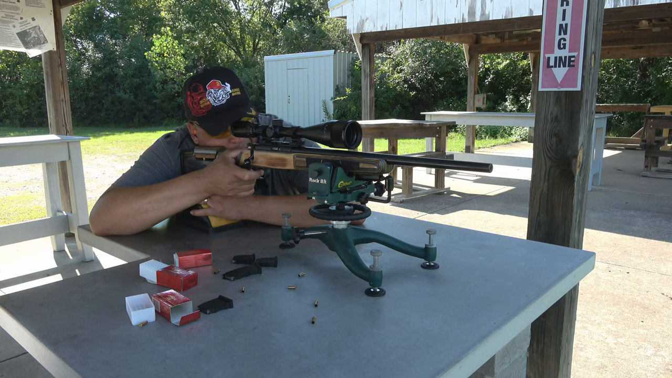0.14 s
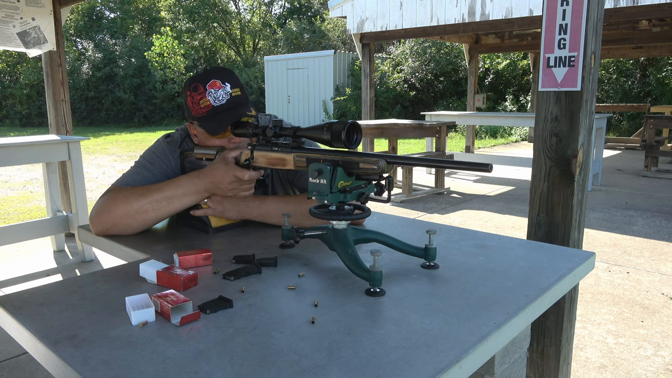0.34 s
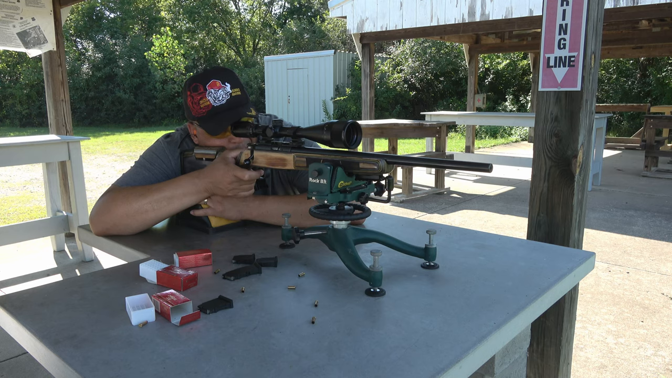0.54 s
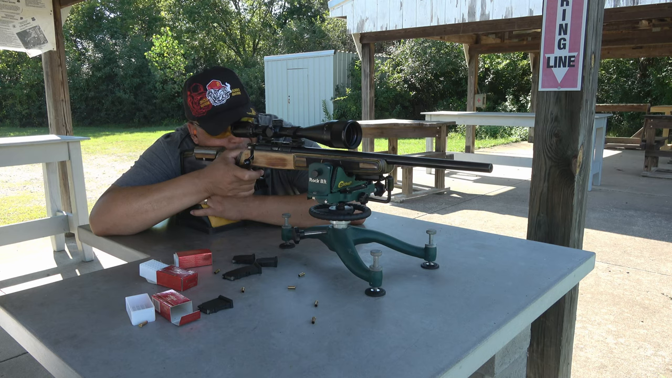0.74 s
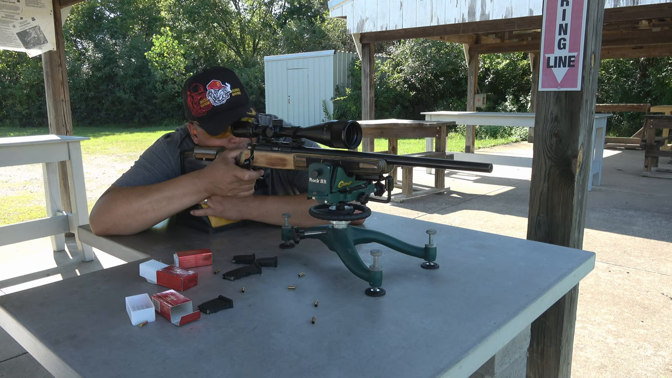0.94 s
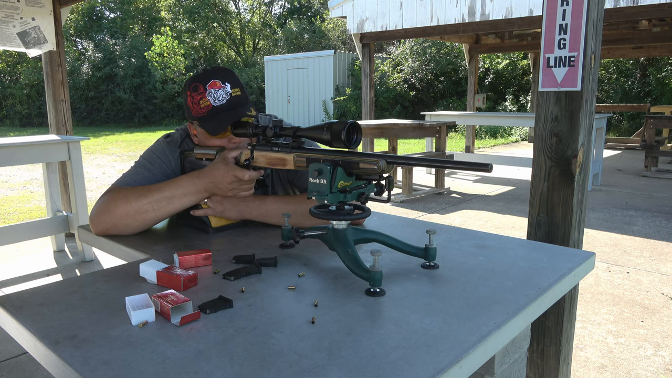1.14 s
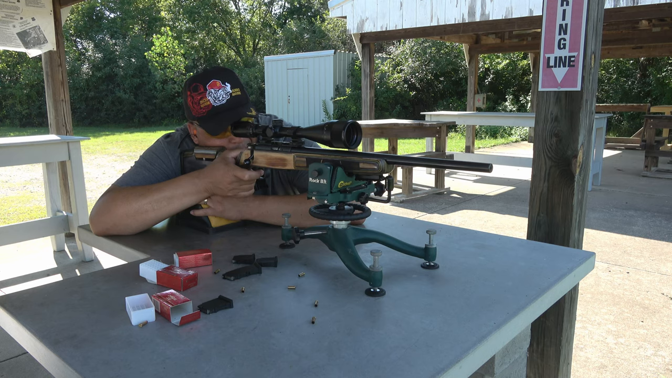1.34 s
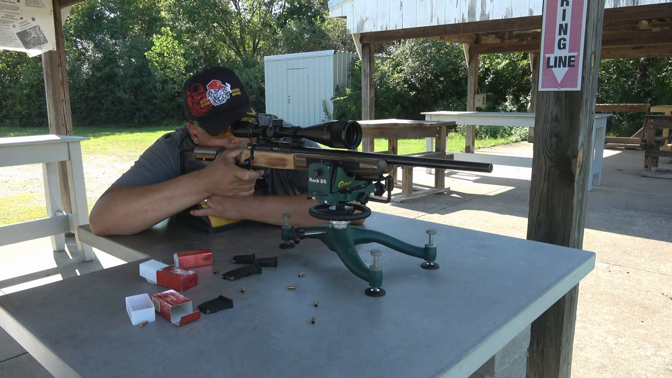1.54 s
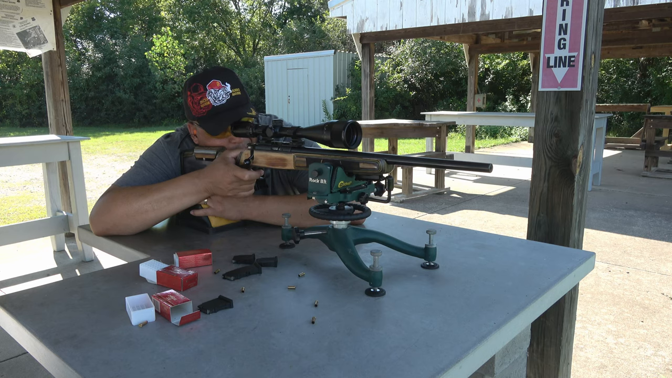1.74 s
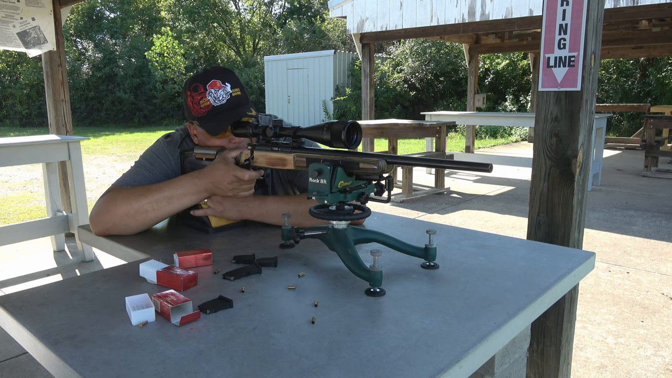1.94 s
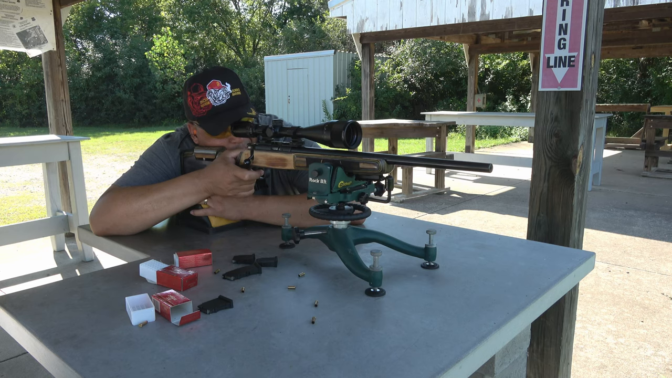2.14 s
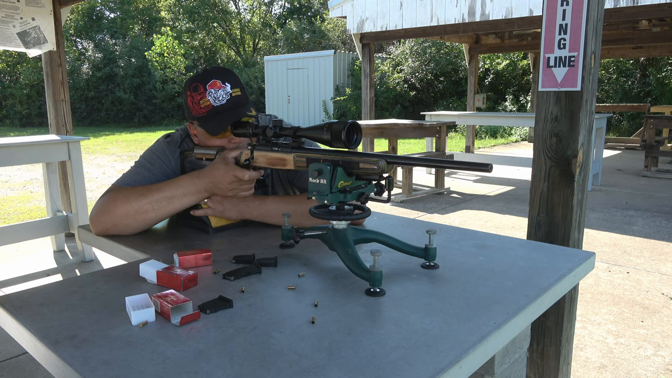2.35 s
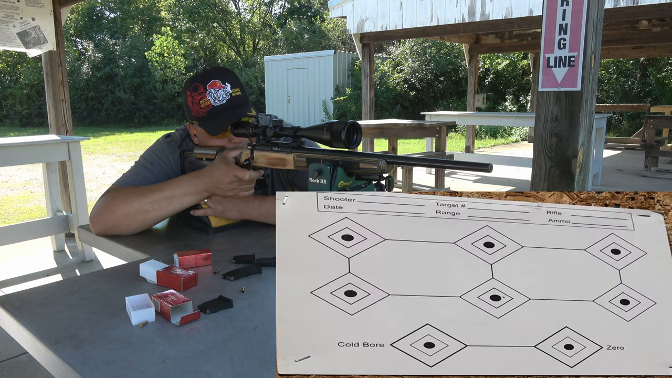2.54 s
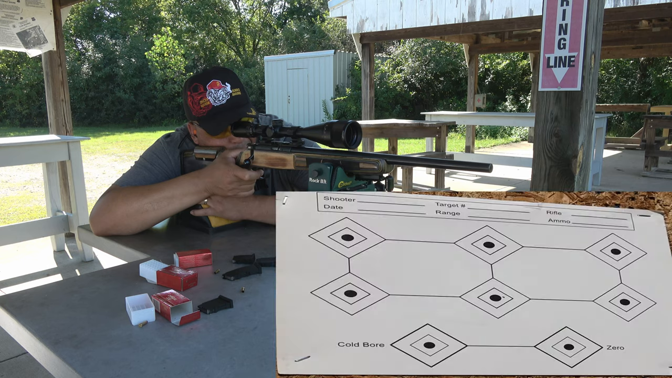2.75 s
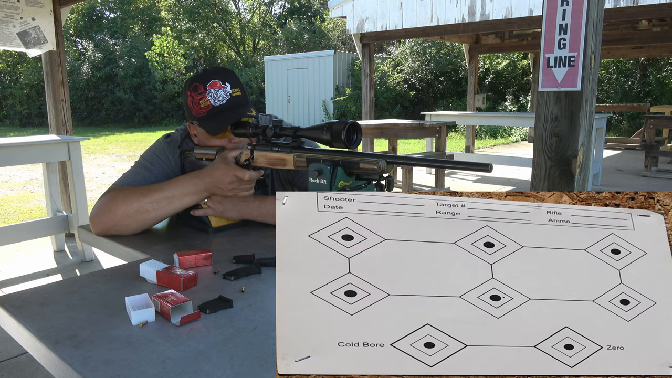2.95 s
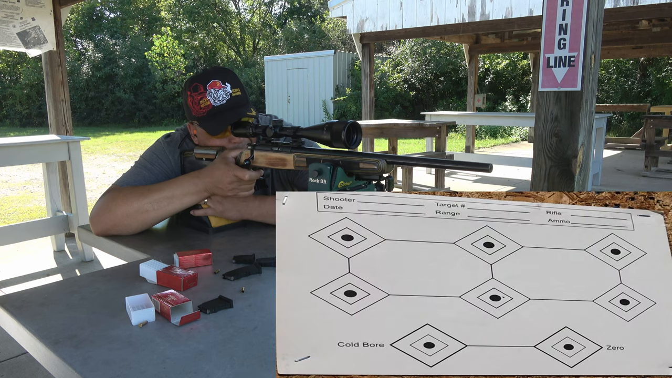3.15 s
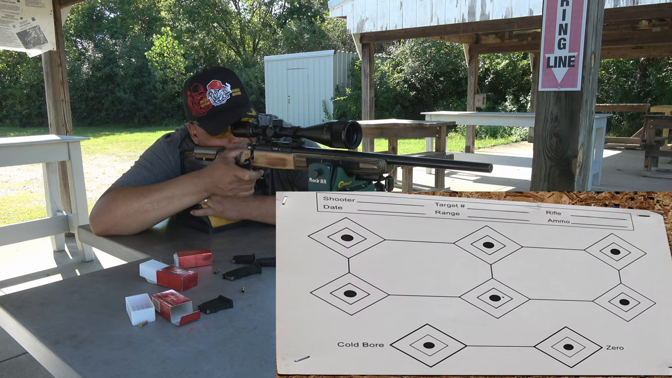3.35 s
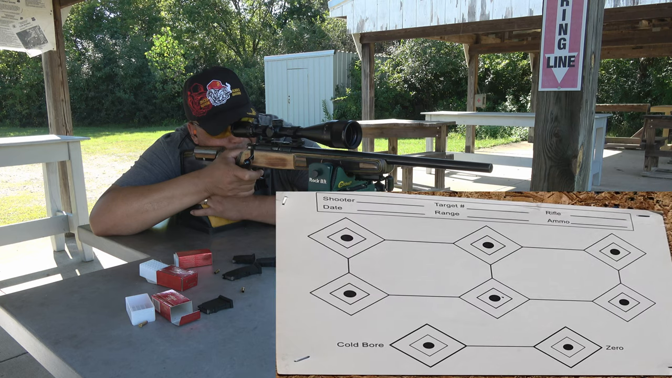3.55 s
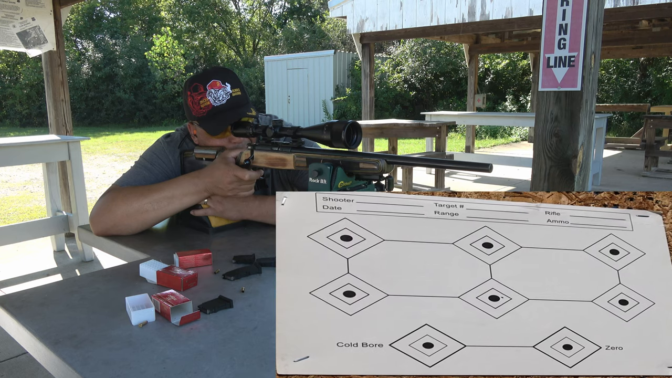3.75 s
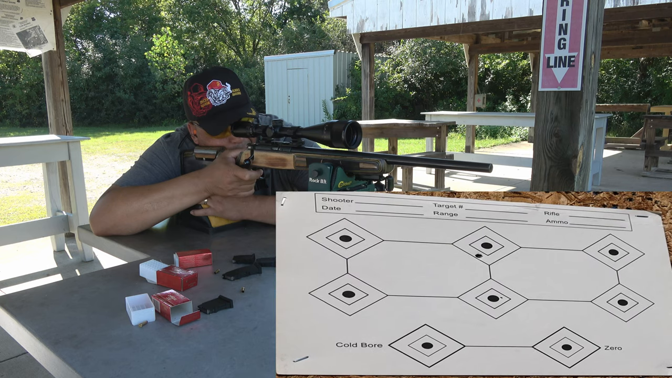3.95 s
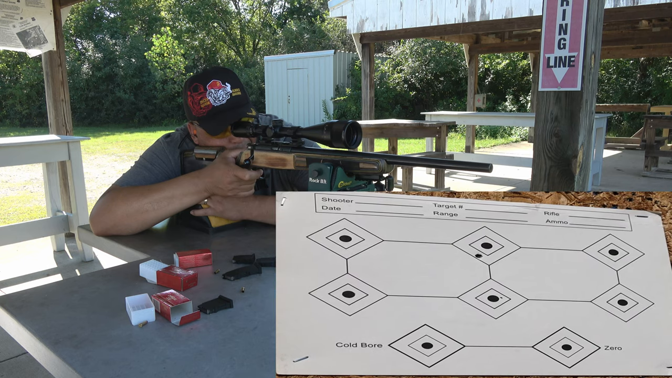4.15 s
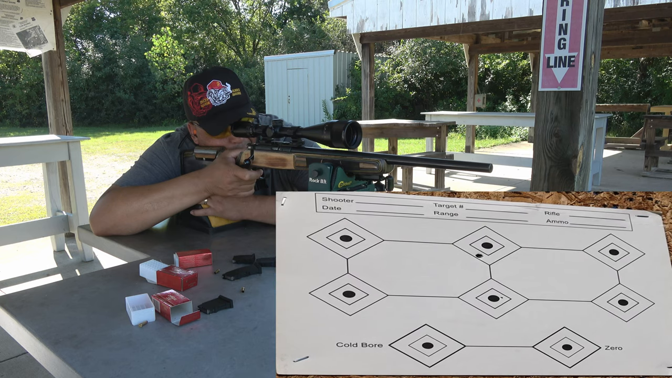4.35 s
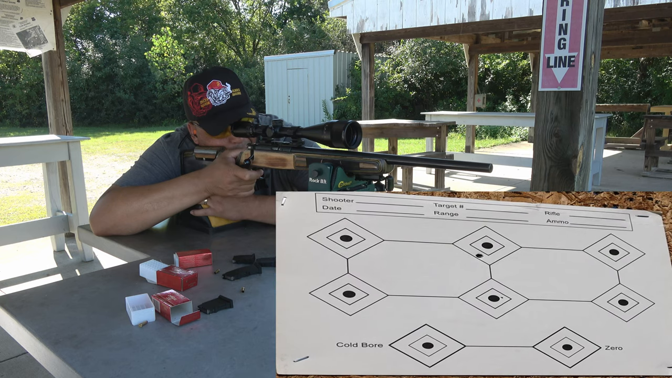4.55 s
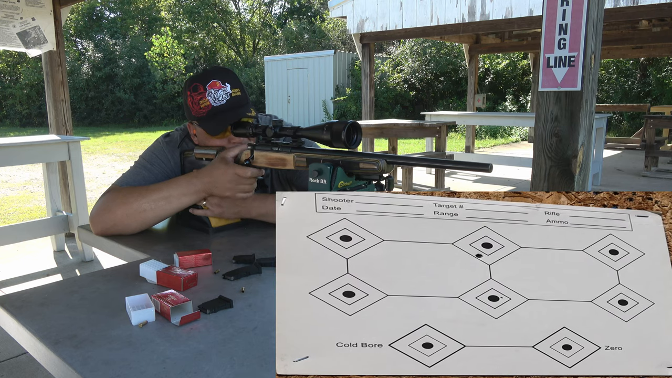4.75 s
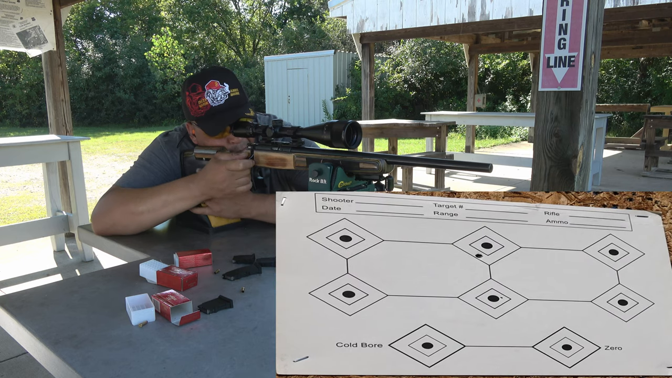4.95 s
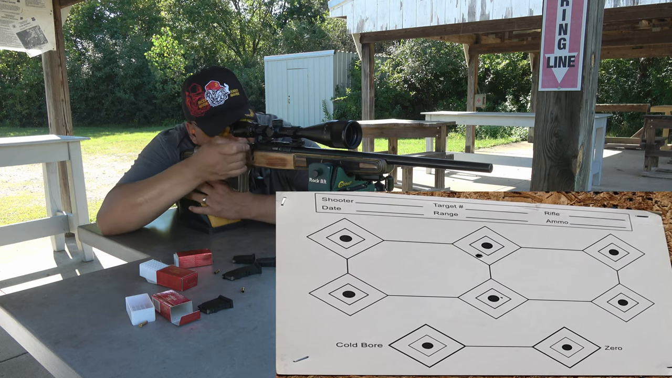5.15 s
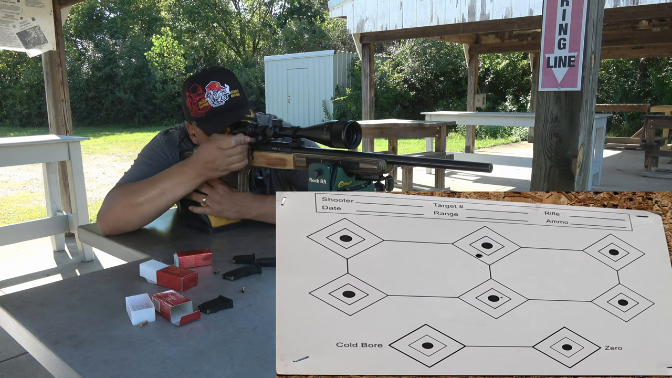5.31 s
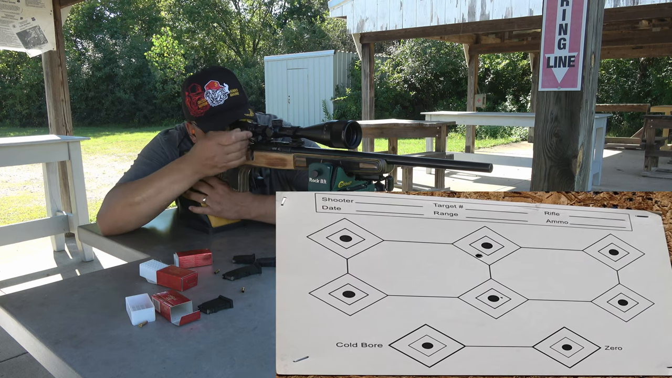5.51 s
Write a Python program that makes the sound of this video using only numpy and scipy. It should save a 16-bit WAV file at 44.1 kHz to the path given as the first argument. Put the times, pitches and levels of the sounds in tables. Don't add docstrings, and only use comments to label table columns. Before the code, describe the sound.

A single loud small-calibre gunshot cracks over constant insect song, its slap echo clattering back before hard metallic bolt clacks.

```python
import sys
import numpy as np
from scipy import signal
from scipy.fft import rfft, irfft, next_fast_len
from scipy.io import wavfile
from scipy.ndimage import uniform_filter1d

SR = 44100
rng = np.random.default_rng(int(sys.argv[2]) if len(sys.argv) > 2 else 0)


def voltage_ratio(decibels):
    exponent = np.asarray(decibels, float) / 20
    return 10 ** exponent


def to_wav(s):
    ch = np.atleast_2d(s).T
    pcm = np.round(np.clip(ch, -1, 1) * 32767)
    wavfile.write(sys.argv[1], SR, pcm.astype(np.int16))


N = 250488
T = np.arange(N) / SR
SHOT_S = 3.8872
SINCE_SHOT = np.maximum(T - SHOT_S, 0)
BASS_ONSET = np.clip(SINCE_SHOT / 0.017, .01, 1) ** 2


def noise():
    return rng.standard_normal(N)


def unit(x):
    return x / np.sqrt(np.mean(x ** 2))


def fade(t, t60):
    return np.exp(-np.log(1000) * t / t60)


def curve(rows):
    s, db = np.transpose(rows)[:2]
    return voltage_ratio(np.interp(T, s, db, left=-200, right=-200))


def swell(rows):
    total = 0
    for s, db, rise, hold, t60 in rows:
        climb = np.maximum(s - T, 0) / rise
        decay = np.maximum(T - s - hold, 0) / t60
        total = total + voltage_ratio(db - 60 * (climb + decay))
    return total


def colour(x, points):
    hz, db = np.transpose(points)[:2]
    f = np.log(np.arange(len(x) // 2 + 1) * SR / len(x) + 1)
    return irfft(rfft(x) * voltage_ratio(np.interp(f, np.log(hz), db)), len(x))


def band(x, hz, width):
    f = np.arange(len(x) // 2 + 1) * SR / len(x)
    return irfft(rfft(x) * np.exp(-((f / hz - 1) / width) ** 2), len(x))


def swelling_band(rows, hz, width):
    return swell(rows) * unit(band(noise(), hz, width))


def walk(rate):
    k = int(SR / rate)
    held = np.repeat(rng.standard_normal(N // 8)[:N // k + 1], k)
    return uniform_filter1d(uniform_filter1d(held, k), k)[:N]


def add(out, s, piece):
    i = int(s * SR)
    out[i:i + len(piece)] += piece[:N - i]


def hedge(x, hz, t60, wet_db):
    t, wet = T[:SR // 3], 0
    for _ in range(2):
        haze = band(rng.standard_normal(len(t)), hz, .3) * fade(t, t60) * np.minimum(t / .015, 1)
        path = signal.oaconvolve(x, haze / np.linalg.norm(haze))[:N]
        wet = wet + np.interp(T + .0001 * walk(150), T, path) / np.sqrt(2)
    return x + voltage_ratio(wet_db) * wet


# (f/Hz, density/dB per Hz)
AIR_SPECTRUM = [(25, -12.5), (45, -9), (75, 2), (120, 5), (170, -4.5), (250, -7.5), (600, -11.5),
                (1200, -21.5), (2500, -23), (4000, -26), (9000, -20), (12000, -25), (15000, -27),
                (16000, -36)]
# (t/s, level/dB, rise/s, hold/s, t60/s)
GUSTS = [
    (2.1, -62, 3.5, .02, 1.5),
    (2.75, -64, 0.89, .01, 1.2),
    (5.66, -78, 4.4, .05, 1.5),
]
# (t/s, level/dB about its mean)
BREEZE = [(0, -0.4), (1, -0.3), (1.8, -0.5), (2.8, 0.6), (3.8, 1.15), (4.6, 0.5), (5.68, 1.1)]


def air():
    base = colour(noise(), AIR_SPECTRUM)
    bands = [band(base, hz, 0.63) * voltage_ratio(1.9 * walk(8.8)) for hz in 30 * 2. ** np.arange(0, 9.5, .75)]
    return voltage_ratio(-61) * curve(BREEZE) * unit(sum(bands)) + swelling_band(GUSTS, 35, 0.98)


def leaves():
    return voltage_ratio(-81) * curve(BREEZE) ** 5 * unit(band(noise(), 13500, 0.18)) * voltage_ratio(1.5 * walk(20))


# (t/s, level/dB, rise/s, hold/s, t60/s)
SLEEVE = [(4.8, -63, 0.77, 0.53, 0.45)]
# (t/s, level/dB, rise/s, hold/s, t60/s)
BUSTLE = [
    (2.55, -82, 0.86, .05, 2.5),
    (4.75, -74.5, 3, 0.1, 2.5),
    (5.55, -63, 2.3, 0.0052, 0.22),
]
# (t/s, peak/dB, f/Hz, t60/s)
BUMPS = [
    (2.561, -54, 536, 0.33),
    (2.63, -51, 501, 0.19),
    (3.058, -53, 221, 0.28),
    (3.501, -52, 225, 0.34),
    (3.549, -53, 515, 0.17),
    (5.598, -55, 232.5, 0.84),
]


def shed_noises():
    out = swelling_band(SLEEVE, 349, 0.54) * voltage_ratio(2.0 * walk(5.5))
    bustle_level = voltage_ratio(-73) + swell(BUSTLE)
    out += bustle_level * unit(band(noise(), 900, 0.99)) * voltage_ratio(2.5 * walk(8.6))
    t = T[:SR // 3]
    for s, db, hz, t60 in BUMPS:
        add(out, s, voltage_ratio(db) * np.sin(2 * np.pi * hz * t) * np.minimum(t / 0.041, 1) * fade(t, t60))
    return out


# (t/s, level/dB, rise/s, t60/s)
FAR_SHOTS = [
    (.495, -56, 0.017, 0.64),
    (.54, -61.5, 0.007, .5),
    (2.895, -57, 0.016, 0.82),
    (3.06, -65.5, 0.014, 0.7),
    (4.691, -73, 0.0096, 0.25),
]
# (f/Hz, density/dB per Hz)
FAR_SPECTRUM = [(200, -23), (500, -1), (900, 2.5), (1500, -8), (2500, -16), (5000, -34.5)]


def far_shots():
    out, t = np.zeros(N), T[:SR // 2]
    for s, db, rise, t60 in FAR_SHOTS:
        thud = unit(colour(rng.standard_normal(len(t)), FAR_SPECTRUM))
        add(out, s, voltage_ratio(db) * thud * np.minimum(t / rise, 1) * fade(t, t60))
    return out


# (t/s, level/dB)
CICADA_SWELL = [(0, -45.5), (1.07, -46), (2.07, -44), (3.0, -45), (4.3, -45.5), (5.68, -45.5)]
# (f/Hz, density/dB per Hz)
CICADA_SPECTRUM = [(3410, -55.5), (5800, -59), (6210, -39.5), (6370, -21), (6850, 1.5), (7770, 8),
                   (8340, 2.5), (8640, -14), (8960, -18.5), (9550, -17), (9850, -37.5), (10800, -35.5),
                   (11500, -35.5), (15000, -60.5), (22000, -120)]


def cicadas():
    clicks = (rng.random(N) < 2500 / SR) * noise()
    blur = 0.26 * noise()
    chorus = unit(colour(clicks + blur, [(5000, -60.0)] + CICADA_SPECTRUM + [(13000, -57.0)]))
    return curve(CICADA_SWELL) * voltage_ratio(-1.9 + 1.0 * walk(34)) * chorus


# (t/s, level/dB, rise/s, hold/s, t60/s)
TRILL = [(4.85, -72, .7, 1.5, 1.5)]
# (t/s, level/dB, rise/s, hold/s, t60/s)
RASP = [(.01, -65, .3, .23, .06)]


def small_insects():
    trill = swelling_band(TRILL, 5700, .024) * (1 + 0.3 * np.sin(2 * np.pi * 55 * T))
    rasp_gate = .25 + .7 * np.clip(np.sin(2 * np.pi * 37 * T), 0, 1) ** 2
    return trill + swelling_band(RASP, 14400, .1) * rasp_gate


def whistle(strokes, length, fall_hz, lift_db):
    out, t = np.zeros(N), np.arange(int(length * SR)) / SR
    for s, db, hz in strokes:
        pitch = hz + fall_hz * (.2 - (t / length) ** 2.2)
        shape = np.minimum(t / 0.0058, 1) * (1 - (t / length) ** 5.9)
        phase = 2 * np.pi * np.cumsum(pitch) / SR
        third = (hz < 4750) * voltage_ratio(-26) * fade(t, .07) * np.sin(3 * phase)
        add(out, max(s - .003, 0), voltage_ratio(db + lift_db) * shape * (np.sin(phase) + third))
    return out


# (t/s, peak/dB, f/Hz)
TICKS = [(5.026, -68.5, 14000), (5.156, -68, 13730), (5.218, -69, 14200), (5.28, -65, 13900),
         (5.348, -67, 14000), (5.6, -64, 13950), (5.664, -63, 13900)]


def ticks():
    return hedge(whistle(TICKS, .009, 300, 0), 14000, .05, -11)


# (t/s, peak/dB, f/Hz)
BIRD = [
    (2.47, -74, 3326),
    (2.5, -74, 3050),
    (3.7, -77, 3070),
]


def bird():
    return hedge(whistle(BIRD, .03, 250, 0), 3300, .3, -8.5)


# (t/s, length/s)
KATYDID = [(.023, 0.063), (.256, 0.043), (.447, 0.051), (.7053, 0.042), (0.905, 0.038), (1.103, .065),
           (1.302, 0.047), (1.556, 0.051), (1.714, 0.061), (1.903, 0.031), (2.046, 0.067), (2.2074, 0.05),
           (2.373, 0.051), (2.5553, 0.041), (2.7232, 0.035), (2.897, 0.057), (3.085, 0.034), (3.27, 0.051),
           (3.447, 0.066), (3.637, 0.035), (3.84, 0.061), (4.527, 0.058), (4.7287, 0.042), (4.946, 0.044),
           (5.148, 0.054), (5.35, 0.048), (5.555, 0.042)]


def katydid():
    out, wobble_hz, strokes_per_s = np.zeros(N), 60 * walk(126), 126
    for s, length in KATYDID:
        db = -48.5 - 125.5 * length
        cycle = T[:int(length * SR)] * strokes_per_s
        gate = np.clip(np.sin(np.pi * np.minimum(cycle % 1 / .75, 1)) * 2, 0, 1)
        attack = np.minimum(0.26 + 0.23 * cycle, 1)
        pitch = 9800 - 550 * (cycle % 1) + wobble_hz[int(s * SR):][:len(cycle)]
        tone = np.sin(2 * np.pi * np.cumsum(pitch) / SR)
        add(out, s - .001, voltage_ratio(db - 2.0) * gate * attack * tone)
    return hedge(out, 9600, .2, -14.5)


def chirps(rows, strokes):
    out = np.array([(s + at * span, db + g, hz) for s, db, span in rows for at, g, hz in strokes])
    return out + rng.standard_normal(out.shape) * [0, 1.5, 25]


# (place in the chirp 0-1, level/dB, f/Hz); the high cricket leads in faintly
LOW_STROKES = [(0, -3.5, 4600), (.47, -1.5, 4680), (1, -1.5, 4663)]
HIGH_STROKES = [(-.28, -15, 4850), (0, -4, 5060), (.47, -3, 5110), (0.999, -2.5, 5120)]
FAR_STROKES = [(0, -0.5, 4930), (.48, 0.5, 4843), (1, -2, 4770)]
# (t/s, peak/dB, first to last stroke/s)
LOW_CRICKET = [(.0693, -43.5, 0.082), (.47, -42.5, 0.081), (.8357, -44, 0.079), (1.2445, -43, 0.078),
               (1.6486, -43, 0.081), (1.998, -44, .081), (2.375, -43, .084), (2.9205, -46.5, 0.077),
               (3.3048, -42.5, 0.073), (4.6523, -45, 0.08)]
HIGH_CRICKET = [(.0832, -54, 0.061), (.401, -51.5, 0.071), (.7088, -49.5, 0.076), (1.0166, -50, 0.07),
                (1.3039, -48, 0.063), (1.6067, -47.5, 0.075), (1.8946, -51, 0.074), (2.147, -49, 0.062),
                (2.4503, -50, 0.08), (2.8774, -54.5, 0.078), (3.1802, -51, 0.077), (3.4765, -51.5, 0.073),
                (3.7763, -48.5, 0.072), (4.4283, -50, 0.081), (4.9716, -49, 0.074)]
FAR_CRICKET = [(.0094, -51.5, 0.074), (.87, -53, 0.082), (2.4967, -54.5, 0.068), (2.8549, -51.5, 0.083),
               (3.2136, -51, 0.075), (3.6371, -52, 0.081), (4.8239, -52, .066), (5.2415, -54.5, 0.081),
               (5.5692, -55, 0.074)]


def crickets():
    low = whistle(chirps(LOW_CRICKET, LOW_STROKES), 0.025, 520, -1.8)
    high = whistle(chirps(HIGH_CRICKET, HIGH_STROKES), .02, 360, 0.64)
    far = whistle(chirps(FAR_CRICKET, FAR_STROKES), .02, 650, -7.5)
    near = hedge(low, 5620, .4, -14.5) + hedge(high, 4100, 0.53, -12.5)
    return near + hedge(far, 4850, .3, -5.5)


# (f/Hz, density/dB per Hz)
CRACK = [(3000, -18), (7500, 0), (9000, -2), (10500, -12), (13000, -19), (16000, -28)]


def knocks(events, cycles, tail_colour, tail_db, tail_t60, body, body_db, size):
    out, t = np.zeros(N), T[:size]
    tail_shape = fade(t, tail_t60) * np.cos(np.pi / 2 * t / t[-1]) * np.minimum(t / 0.0008, 1)
    for s, db, hz, treble_db in events:
        a, b, c = rng.standard_normal((3, len(t)))
        t60 = min(cycles / hz * voltage_ratio(-0.18 * db), 0.045)
        rise = np.minimum(t / min(.0005, 2 / hz), 1)
        ring = (np.sin(2 * np.pi * hz * t) + 0.59 * unit(band(a, hz, 0.15))) * fade(t, t60)
        crack = voltage_ratio(treble_db) * unit(colour(b, CRACK)) * fade(t, .5 * t60)
        modes = 0
        for k, (f, g, d) in enumerate(body):
            mode = np.sin(2 * np.pi * f * (1 + 0.0194 * a[k]) * t)
            modes = modes + voltage_ratio(g + 6.7 * c[k]) * mode * fade(t, d)
        tail = voltage_ratio(tail_db - 0.069 * db) * unit(colour(c, tail_colour)) * tail_shape
        add(out, s, voltage_ratio(db) * rise * (ring + crack + voltage_ratio(body_db) * modes + tail))
    return out


# (t/s, peak/dB, ring f/Hz, treble/dB)
HAND = [(3.494, -66, 2500, -20), (3.502, -61, 3050, -20), (3.5105, -59, 3300, -20), (3.519, -60, 3600, -20),
        (3.528, -62, 3900, -20), (3.537, -63, 3000, -20), (3.564, -64, 2600, -20), (3.665, -64, 3400, -20),
        (4.597, -47.5, 3126, -12), (4.598, -50, 1500, -20), (4.700, -41, 1195, 2),
        (4.7045, -49, 3500, -6.5), (4.739, -54, 627, -24), (4.7435, -42.5, 3120, -15),
        (4.768, -53.5, 2030, -24), (5.097, -55, 2200, -25), (5.115, -60, 2307, -24.5),
        (5.178, -54, 2490, -25), (5.183, -48, 1990, -25), (5.215, -56, 5190, -20), (5.215, -56, 11000, -6),
        (5.53, -60, 2540, -17.5)]
# (t/s, peak/dB, ring f/Hz, treble/dB)
BOLT = [(5.1222, -50, 13400, -3), (5.126, -50, 12800, -5), (5.1266, -26.5, 1880, -15),
        (5.133, -44, 1380, -13), (5.141, -41.5, 2010, -15), (5.129, -44, 4300, -7.5),
        (5.132, -58, 12900, -9), (5.1282, -36, 766, -30), (5.370, -40, 4390, -18), (5.3715, -51, 900, -25),
        (5.378, -45, 2200, -5), (5.3865, -33, 1500, -18), (5.3908, -20.5, 2400, -4),
        (5.3913, -25, 7300, -12), (5.3918, -16.5, 1960, -6), (5.393, -16, 8150, -2),
        (5.3945, -21, 1970, -3.5), (5.396, -33.5, 1010, 8), (5.3968, -40, 7500, -12),
        (5.3885, -30, 7500, -8), (5.4134, -28, 2350, -19), (5.4183, -11.5, 2490, -5.5),
        (5.4185, -28, 520, -30), (5.4222, -26.5, 7800, -6), (5.4192, -14.5, 4750, -15),
        (5.4203, -18, 1730, -3.5), (5.4235, -23.5, 1050, -8), (5.424, -30, 690, -30),
        (5.4225, -28, 420, -30), (5.395, -44, 420, -30), (5.4235, -15, 3750, -9.5),
        (5.6533, -36, 1765, -35), (5.658, -43.5, 790, -36), (5.6615, -37, 1764, -32.5)]
# (f/Hz, level/dB, t60/s)
STOCK_MODES = [(420, 0, 0.13), (604, -8, 0.11), (716, 5.5, 0.043), (770, -7, 0.11), (970, -6, 0.07),
               (1318, -1, 0.052), (1500, -4.5, 0.14), (2220, 5.5, 0.011), (2900, 6, 0.021)]
# (f/Hz, density/dB per Hz)
METAL_TAIL = [(200, -29), (420, -16), (800, -6), (1500, 6.5), (2800, -3), (5000, -4), (8000, -9.5),
              (10000, -19), (15000, -40)]
# (t/s, level/dB, rise/s, hold/s, t60/s)
ROOF_AFTER_BOLT = [(5.43, -49, .03, .01, 0.37)]


def bolt():
    out = knocks(BOLT, 23, METAL_TAIL, -23.0, 0.16, STOCK_MODES, -22.5, size=SR // 6)
    out += knocks(HAND, 16.0, METAL_TAIL, -16.0, 0.145, STOCK_MODES, -18, size=SR // 6)
    out = signal.sosfilt(signal.butter(2, 200, "high", fs=SR, output="sos"), out)
    return out + swelling_band(ROOF_AFTER_BOLT, 3500, 0.63)


# (t/s, peak/dB, ring f/Hz,
# treble/dB)
SNAPS = [(4.1576, -4, 7630, -6.5), (4.1579, -0.5, 10740, -6.5), (4.158, -16, 12970, -21.5),
         (4.1709, -8.5, 4900, -10.5), (5.1223, -32.5, 2020, -11), (5.1225, -39, 4600, -3),
         (5.1238, -33, 3500, -9.5), (5.4146, -33, 13000, -10), (5.3927, -11, 1970, -21),
         (5.4143, -11, 2750, -9), (5.4213, -13, 1800, -18)]


def snaps():
    return knocks(SNAPS, 9.9, METAL_TAIL, -30.5, 0.15, [], -20, size=SR // 12)


# (t/s, peak/dB, ring f/Hz, treble/dB)
SLAP = [(4.1488, -19, 2010, -6.5), (4.1497, -17, 4270, -11.5), (4.152, -18, 2920, -24.5),
        (4.1542, -18, 2900, -18.5), (4.1562, -14, 2950, -17.5), (4.1618, -20, 4070, 0.5),
        (4.1635, -31, 12500, -11), (4.1848, -27.5, 9300, -5.5), (4.166, -29.5, 2300, -8.5),
        (4.164, -20, 6740, -2), (4.1706, -15.5, 2900, -5.5), (4.175, -18.5, 5000, -10.5),
        (4.1758, -19, 2090, -16.5), (4.1772, -18.5, 3230, -10.5), (4.1788, -20.5, 2200, -11),
        (4.181, -24.5, 2560, -9), (4.1845, -21.5, 4480, -1), (4.187, -24, 5600, -2),
        (4.191, -25.5, 2900, -8.5), (4.196, -27.5, 2065, -5), (4.201, -26.5, 2970, -4.5),
        (4.2075, -27.5, 4700, 0), (4.215, -30, 3200, -1), (4.2341, -33, 3000, -8.5),
        (4.2385, -32.5, 1920, -19.5), (4.246, -36.5, 4100, -7.5), (4.325, -41, 2760, -2.5)]
# (f/Hz, density/dB per Hz)
SLAP_TAIL = [(700, -2.5), (1500, 2), (2500, 1), (5000, -0.5), (9000, -2), (15000, -32.5)]
# (t/s, level/dB, rise/s, hold/s, t60/s)
BANK = [
    (4.152, -35.5, .01, .05, 0.286),
    (4.32, -45.5, .3, 0.037, 0.71),
]
# (f/Hz, density/dB per Hz)
BANK_SPECTRUM = [(500, -13), (1100, -1), (3000, 0), (5500, -3.5), (9000, -8), (12000, -25.5), (16000, -39)]


def bank_slap():
    rattle = knocks(SLAP, 58, SLAP_TAIL, -28.0, 0.71, [], -20, size=SR // 3)
    return rattle + swell(BANK) * voltage_ratio(1.5 * walk(50)) * unit(colour(noise(), BANK_SPECTRUM))


# (t/s, level/dB, rise/s, hold/s, t60/s)
WOODS = [
    (3.9, -20, .02, 0.07, .15),
    (4.0, -33.5, 0.089, 0.0077, 1.0),
]
# (t/s, level/dB, rise/s, hold/s, t60/s)
BENCH = [(4.05, -44, .2, 0.038, 0.97)]
# (t/s, level/dB, rise/s, hold/s, t60/s)
FIELDS = [(4.85, -72, 2.7, 0.05, 6.1)]
# (t/s, level/dB, rise/s, hold/s, t60/s)
BOOM = [
    (3.91, -33.5, .02, .01, .2),
    (3.93, -39, 0.037, 0.011, 1.6),
]
# (f/Hz, level/dB, t60/s)
THUMP = [(62, -18.5, .2), (88.2, -17, 0.21), (119, -22.5, .25), (187.2, -22.5, 0.26)]


def surroundings():
    out = np.zeros(N)
    for f, db, t60 in THUMP:
        out += BASS_ONSET * voltage_ratio(db) * np.sin(2 * np.pi * f * SINCE_SHOT) * fade(SINCE_SHOT, t60)
    out += swelling_band(WOODS, 2000, 0.5) * voltage_ratio(2.1 * walk(30))
    out += swelling_band(BENCH, 330, 0.32) + swelling_band(FIELDS, 2900, 0.64)
    return out + swelling_band(BOOM, 190, 0.38)


# (t/s, level/dB, rise/s, hold/s, t60/s)
ROAR = [
    (3.8872, 4.5, 0.0047, 0.0017, 0.018),
    (3.893, -6, 0.0073, 0.037, 0.36),
    (3.9, -18.5, 0.028, 0.0093, 0.61),
    (3.95, -12.5, 0.034, 0.0084, 0.31),
    (4.1, -37.5, .1, 0.036, 0.35),
]
# (f/Hz, density/dB per Hz at first, extra fading/dB per s)
ROAR_SPECTRUM = [(29.87, -30, 199.5), (60.3, -16, 196.5), (120, -13.5, 101.5), (259.7, -1, 33.5),
                 (600, -1, 6.5), (1500, 1, 14), (2200, -4, 1), (3500, -4, 12.5), (5000, -3, 12),
                 (9300, -4, 27), (10000, -9.5, 45), (12400, -11, 62), (16400, -18, 80.5)]


def roar():
    out = np.zeros(N)
    hz, _, fading = np.transpose(ROAR_SPECTRUM)
    source = unit(colour(noise(), ROAR_SPECTRUM))
    trunks, groves, echoes = 1.4 * walk(200), 0.2 * walk(22), swell(ROAR)
    span = next_fast_len(int(np.sum(SINCE_SHOT > 0)) + SR // 20)
    for f in 35 * 2. ** np.arange(0, 9.1, .5):
        extra_db = SINCE_SHOT * np.interp(np.log(f), np.log(hz), fading)
        lumps = voltage_ratio(trunks + groves + 1.4 * walk(60) - extra_db)
        onset = BASS_ONSET ** (1 / (1 + (f / 900) ** 4))
        out[-span:] += 0.39 * band(source[-span:], f, 0.34) * (lumps * echoes * onset)[-span:]
    return out


# (t/s, peak/dB, push length/ms, damping per push)
BLAST = [
    (3.8872, 9.5, .75, .5),
    (3.8906, -5, 2.4, 1.3),
    (3.8925, 8, 1.05, 1.15),
    (3.9072, -12, 2.2, .15),
]


def blast():
    out = np.zeros(N)
    for s, db, ms, damping in BLAST:
        pushes = np.arange(int(.009 * ms * SR)) / SR / (ms / 1000)
        add(out, s, voltage_ratio(db) * np.cos(np.pi / 2 * pushes) * np.exp(-damping * pushes))
    return out


def scene():
    background = air() + leaves() + shed_noises() + far_shots()
    creatures = cicadas() + small_insects() + ticks() + bird() + katydid() + crickets()
    rifle = bolt() + snaps() + bank_slap() + surroundings() + roar() + blast()
    return (background + creatures + rifle)[None]


def top_cut(x):
    return signal.sosfilt(signal.butter(12, 15800, fs=SR, output="sos"), x)


def record(dry):
    bass_cut = signal.butter(1, 30, "high", fs=SR, output="sos")
    mix = np.clip(signal.sosfilt(bass_cut, dry), -.99, .99)
    return top_cut(mix)


dry = scene()
out = record(dry)
to_wav(out)
```